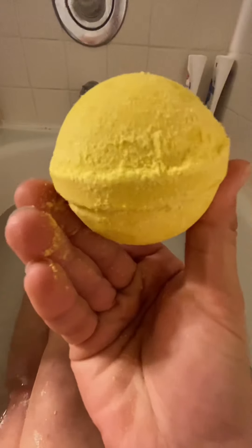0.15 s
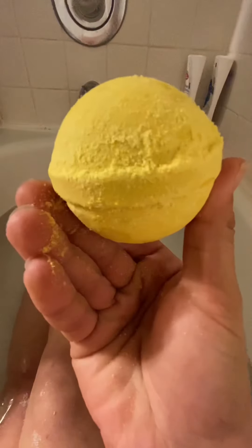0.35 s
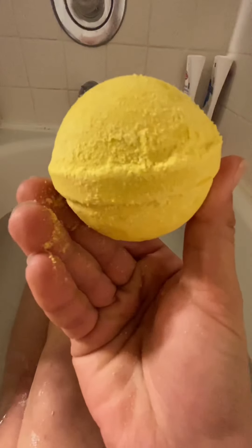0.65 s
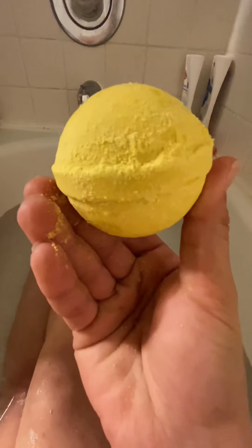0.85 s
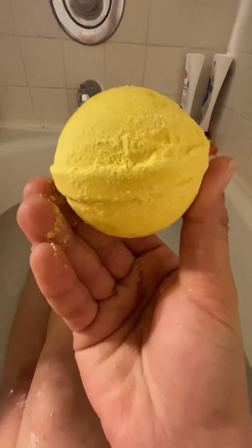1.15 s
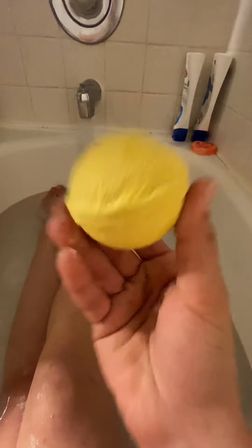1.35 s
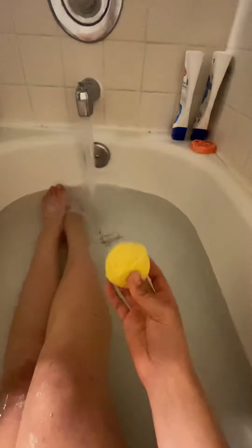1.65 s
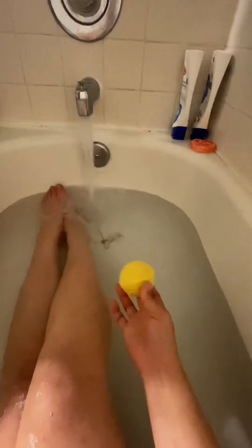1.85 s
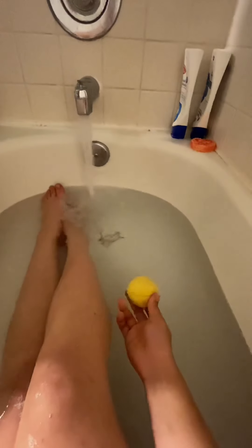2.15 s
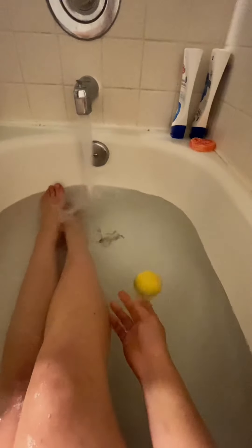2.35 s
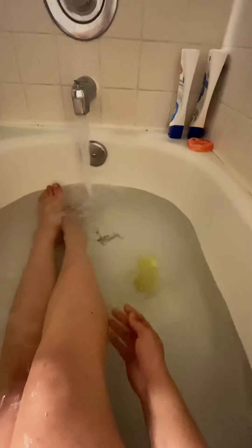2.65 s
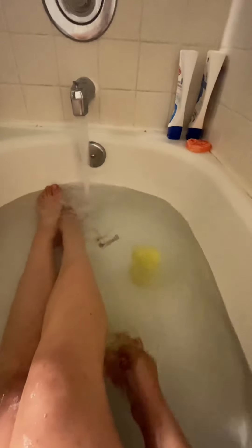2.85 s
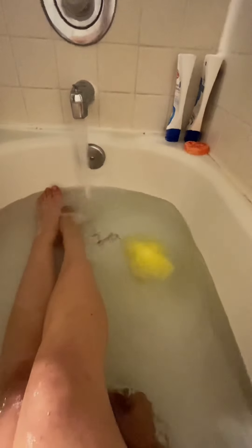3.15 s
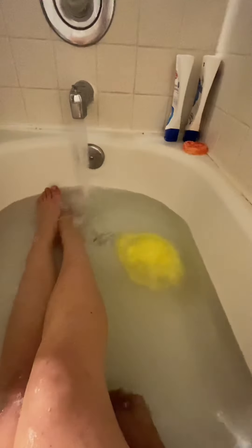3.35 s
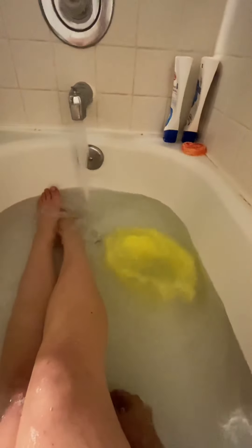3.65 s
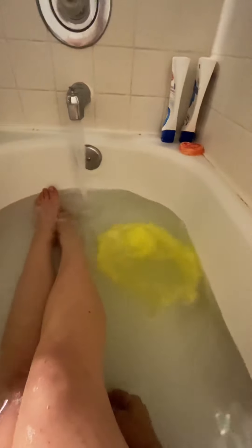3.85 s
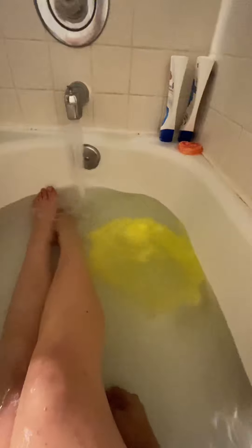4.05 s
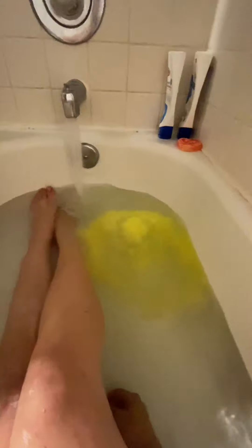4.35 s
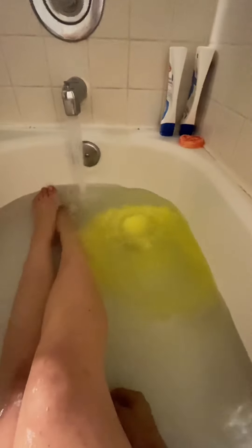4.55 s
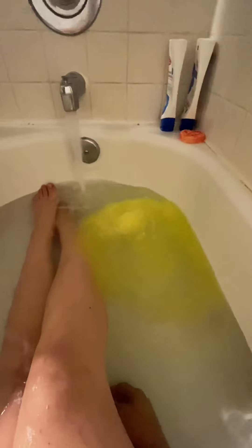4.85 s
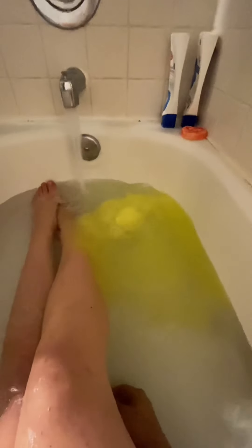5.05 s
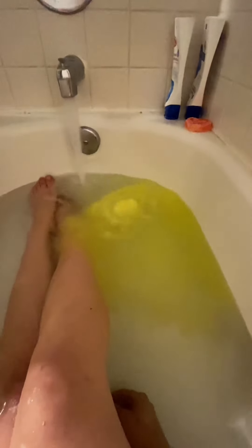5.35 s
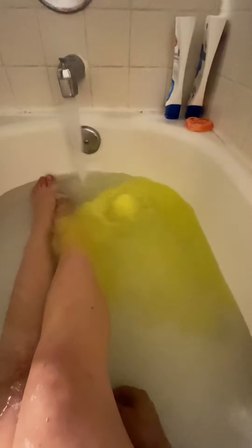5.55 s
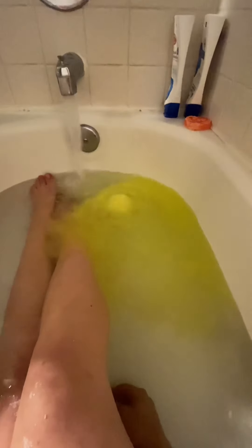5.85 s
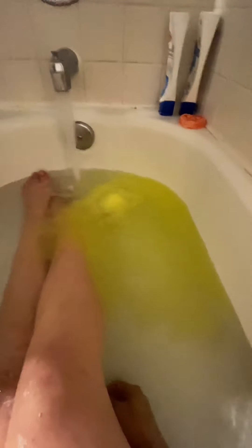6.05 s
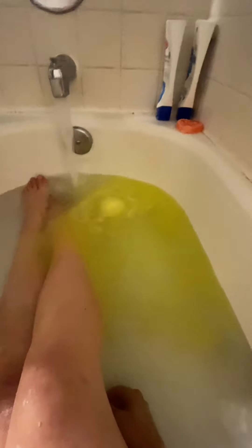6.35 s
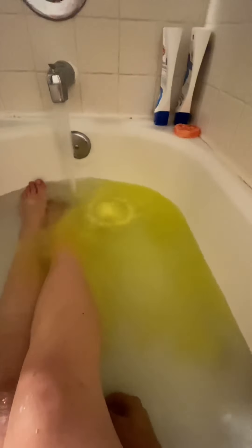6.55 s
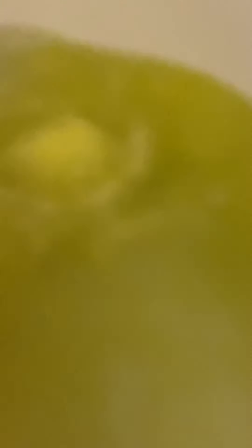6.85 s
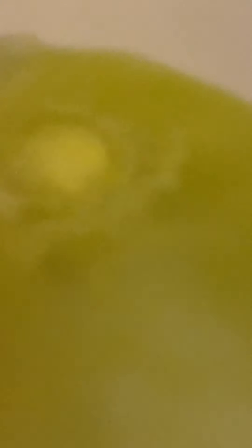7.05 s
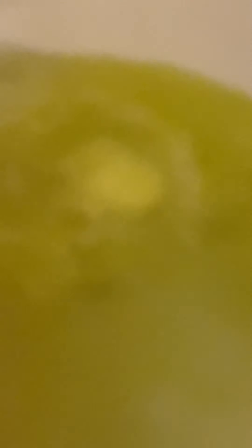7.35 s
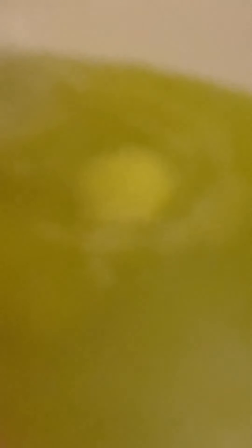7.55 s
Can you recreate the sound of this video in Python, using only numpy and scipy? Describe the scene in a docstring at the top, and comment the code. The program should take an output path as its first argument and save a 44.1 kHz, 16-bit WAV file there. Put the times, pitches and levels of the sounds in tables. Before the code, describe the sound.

A steady tap stream plunges into a half-full bathtub in a small tiled bathroom, with low tub rumble, dense bubbly splash and fine spray. Drops tick and small splats crackle throughout. A soft slop and boom come early on, gurgles later, and after six seconds the water churns harder as the microphone dips closer. A low motor hum continues underneath.

```python
"""A tap pours into a half-full bathtub in a small tiled bathroom, over the steady hum of a motor.
From the start, filtered noise rings the tub and damped sines give bubbles and spray, which slowly grows;
noise bursts tick as drops and clumps of damped sines splat. The first slop and soft modal boom come at 2.6 s,
and from 3.3 s gliding sines gurgle as bigger bubbles, thickest after 6 s. Around 6.4 s the water churns harder
and the microphone dips toward it; the splash moves to the centre, and slops and booms return to the end."""
import sys
import numpy as np
from scipy import signal
from scipy.fft import rfft, irfft, next_fast_len
from scipy.io import wavfile
from scipy.ndimage import uniform_filter1d, map_coordinates

SR = 44100
rng = np.random.default_rng(int(sys.argv[2]) if len(sys.argv) > 2 else 0)


def pcm_store(signal):
    """Save signal as 16-bit PCM."""
    levels = np.round(np.clip(np.atleast_2d(signal), -1, 1) * 32767)
    wavfile.write(sys.argv[1], SR, levels.astype(np.int16).T)


N = 340452

# Resonances of tub and room: f/Hz, width/Hz, relative level/dB
TUB_MODES = [(69.8, 12, -7), (85, 8, 1.5), (109, 8.5, 0), (117.7, 8.1, 5), (135, 10, -3), (169.4, 8.3, -3),
             (198.6, 8.1, -5.5), (233.3, 8.4, -0.5), (257.1, 7.5, 0.5), (295.4, 11.4, -6), (312.2, 12, -10),
             (369.8, 7.7, -9.5), (392.4, 7.6, -12), (423.2, 4.5, -17), (446.4, 17, -12), (478, 8.7, -7.5),
             (515.4, 9.3, -2.5), (678.4, 26, -17), (890, 81, -12.5), (1070, 41, -20.5), (1433, 50, -19.5)]
# Filter gain for the churning noise: f/Hz, relative level/dB
CHURN_COLOUR = [(20, -45), (35, -20.5), (58, -15), (110, -2.5), (200, -6.5), (280, -8), (340, -12),
                (450, -4.5), (700, -14), (1500, -18), (4000, -78)]
# Left-right correlation of the rumble: f/Hz, correlation (-1 to 1)
RUMBLE_CORRELATION = [(150, 1), (300, 0.95), (480, 0.82), (620, -0.9), (1000, -0.7), (1500, -0.65)]
# Water slopping in the tub: t/s, lift of the churn/dB
SLOPS_OF_WATER = [(2.64, 6), (6.31, 9), (6.585, 7.5), (6.66, 1.5), (7.05, 8.5), (7.62, 10)]
# Filter gain for large bubbles, small bubbles and spray: f/Hz, relative level/dB
LARGE_BUBBLE_COLOUR = [(250, -44), (550, 0), (675, -2), (750, -6.5), (880, 0), (960, -3), (1065, 2.5),
                       (1160, -6), (1250, 0.5), (1340, -5), (1435, 3.5), (1550, -4), (1900, -10),
                       (3000, -15)]
SMALL_BUBBLE_COLOUR = [(700, -19), (1400, -8.5), (1900, -9.5), (2350, -2.5), (2650, -1), (2850, 0),
                       (3100, 2), (3500, -0.5), (3950, -10), (4500, 0), (6000, -3.5), (12000, -40)]
SPRAY_COLOUR = [(2000, 3.5), (4000, 5), (4700, 5), (6200, 6.5), (8000, 11.5), (10000, -15.5), (12300, 4),
                (14300, 8.5), (16000, 0)]
# Drops that smack the surface: t/s, relative level/dB, f/Hz of the trapped bubble
SMACKING_DROPS = [(0.1292, -18, 2700), (0.799, -21.5, 2830), (0.945, -19, 4750), (1.0182, -22.5, 3440),
                  (1.582, -20.5, 6500), (1.625, -22.5, 5700), (1.7968, -18.5, 6000), (1.965, -21, 4270),
                  (2.133, -22.5, 4370), (2.193, -16, 3050), (2.801, -17.5, 2780), (3.739, -23, 6000),
                  (4.272, -18, 3400), (4.677, -20, 2160), (4.949, -19, 4400), (5.0889, -17, 5980),
                  (5.3844, -16.5, 5620), (5.568, -21.5, 7070), (5.651, -21, 5640), (6.156, -20, 6300),
                  (6.284, -16, 3020), (6.404, -15.5, 2910), (6.741, -16, 4730), (6.9152, -17.5, 2810),
                  (7.041, -18, 4320)]
# Fat lumps of the stream that splat: t/s, relative level/dB, f/Hz at the centre of the clump
FAT_LUMPS = [(.199, -26, 3100), (0.3945, -27, 3980), (0.52, -31.5, 3040), (.687, -34, 3000),
             (1.073, -32.5, 2940), (1.122, -28, 3580), (1.307, -26.5, 2660), (1.32, -33, 3140),
             (2.903, -27.5, 3020), (3.643, -27.5, 3150), (3.987, -28, 3450), (4.009, -30, 3270),
             (4.21, -31, 3150), (4.38, -31, 3180), (5.912, -27, 3400), (6.219, -30, 3160),
             (6.472, -30, 3900), (6.915, -35, 2860), (7.107, -29, 2930), (7.21, -26, 3150),
             (7.329, -29.5, 2900), (7.679, -29, 3230)]
# Big bubbles: t/s, relative level/dB, starting f/Hz, rise/octaves per ring time
BIG_BUBBLES = [(3.33, -27, 905, 0.33), (4.172, -27, 834, 1), (4.187, -15.5, 1230, 1),
               (4.949, -24.5, 525, 0.27), (5.644, -18.5, 1410, .2), (6.129, -20, 976, 0.49),
               (6.272, -31, 860, .3), (6.285, -21, 385, 0.34), (6.36, -18, 1284, 0.37),
               (6.404, -15.5, 1043, 0.34), (6.45, -25, 1440, .3), (6.492, -23, 995, .2),
               (6.545, -23, 673, 0.25), (6.555, -16, 376, 0.27), (6.577, -21.5, 476, .3),
               (6.781, -24, 1300, .3), (6.783, -18, 1630, 0.41), (7.03, -22, 387, .3),
               (7.04, -26, 1340, .3), (7.567, -30, 1360, 0.31), (7.65, -23.5, 1420, 0.25)]
# Soft booms of the tub: t/s, relative level/dB
BOOM_TIMES = [(2.632, 8.5), (6.691, 4), (7.421, -0.5)]
# Modes of one boom: f/Hz, relative level/dB, t60/s
BOOM_RESONANCES = [(70, -30.5, 0.45), (88.5, -26, 0.45), (133.5, -27.5, 0.27), (188, -25, 0.17),
                   (236, -18.5, 0.082)]
# Motor lines: f/Hz, rms level/dB about which each line wavers
MOTOR_LINES = [(43, -46.5), (119.3, -32)]
# Power that arrives straight from the jet: f/Hz, share (clipped to 0-1)
DIRECT_SHARE = [(500, 0.28), (2000, 0.1), (4000, 0.13), (6000, 0.42), (10000, 0), (16000, 0)]
# Reverberation of the tiles: f/Hz, t60/s
TILE_DECAY = [(100, .45), (500, 1), (3000, 0.63), (8000, 0.15), (16000, 0.07)]
# Side-to-mid ratio of the scrambled echoes: f/Hz, level/dB
WASH_WIDTH = [(800, 4.5), (1800, -0.5), (3000, 11.5), (4100, 0), (5000, 11.5), (6000, -4), (8000, 6),
              (10000, 48), (12000, 20), (16000, -17)]
# Colour at the microphone once near the water: f/Hz, mid level/dB, side level/dB
NEAR_WATER_COLOUR = [(80, 0, 0), (550, -1, -4), (1300, 2, -4), (2300, 2, -7), (3300, 5, -6), (5000, -1, -4),
                     (8000, -5.5, .5), (13000, 0, 0)]

RUMBLE_DB, BUBBLING_DB, SPLASH_DB, SPRAY_DB = -29, -40, -36.5, -39  # steady pour, before the room
SPRAY_DB_PER_S = 0.4537  # the spray grows a little as the tub fills
SWELL_S, SWELL_WIDTH_S = 6.43, 0.86  # for a moment the water churns harder
SWELL_RUMBLE_DB, SWELL_BUBBLING_DB = 0.5, 3.5
SLOP_S = 0.088  # half-width at 1/e
BURSTS_PER_S, BURST_S = 70, 0.0044  # how often lumps land, how fast they die
BURST_DB = 3.5  # mean lift of one lump, before each layer takes its share
SMACK_S, SMACK_ATTACK_S = 0.0043, 0.0004
SCATTER_S, SCATTER_DB = 0.02, -13.5  # the droplets that fall back
RING_S, RING_DB, RING_RISE_PER_S = 0.0036, -6.5, 5.5  # the tiny trapped bubble; fractional rise in pitch
SPLAT_S, SPLAT_OCTAVES, SPLAT_CYCLES = 0.0055, 0.294, 3.2  # length; bubble pitch spread and decay
GULP_T60_S, GULP_SIZE_LAW = 0.043, 0.75  # ring time at 1 kHz; lower bubbles ring longer by this power
GULP_FROTH_DB, GULP_FROTH_OCTAVES = -10.52, 0.35  # small bubbles shed by a big one: level, pitch spread
LEAN_START_S, LEAN_END_S = 6.45, 6.9  # the microphone dips toward the water
FIXED_ECHO_DB, WASH_DB = -1, -1  # echoes off still walls; echoes scrambled by the water
STILL_BELOW_HZ = 3470  # fixed echoes roll off above this
LOW_CUT_HZ, TOP_HZ = 38, 15850


def pour():
    """Superposition: a steady jet's rumble and splash add, both modulated by one swell."""
    churning = swell(SWELL_S, SWELL_WIDTH_S)
    rumble_db = RUMBLE_DB + SWELL_RUMBLE_DB * churning
    bubbling_db = BUBBLING_DB + SWELL_BUBBLING_DB * churning
    spray_db = SPRAY_DB + SPRAY_DB_PER_S * np.arange(N) / SR
    return rumble(rumble_db) + splashing(bubbling_db, SPLASH_DB, spray_db)


def tub_response(f):
    """Modal superposition: resonances of alternating sign, each confined to its neighbourhood."""
    total = 0
    for k, (centre, width, db) in enumerate(TUB_MODES):
        resonance = 1j * f * width / (centre ** 2 - f ** 2 + 1j * f * width)
        nearby = 1 / (1 + ((f - centre) / (3 * width)) ** 2)
        total = total + (-1) ** k * amp(db) * resonance * nearby
    return total


def rumble(level_db):
    """Forced resonance: the plunging jet churns the water and keeps the tub's modes ringing."""
    ringing = unit(filtered(rng.standard_normal((2, N)), tub_response))
    uneven_noise = rng.standard_normal((2, N)) * amp(2.8 * wobble(32))
    churn = coloured(uneven_noise, CHURN_COLOUR) * amp(surges(SLOPS_OF_WATER, SLOP_S))

    def mid_side_gains(hz):
        """Correlation of two channels follows from the ratio of mid to side."""
        turn = np.arccos(np.clip(along(RUMBLE_CORRELATION, hz), -1, 1)) / 2
        return np.array([np.cos(turn), np.sin(turn)])

    mid, side = filtered(amp(-0.46) * ringing + amp(-8.5) * churn, mid_side_gains)
    return amp(level_db) * np.array([mid + side, mid - side])


def splashing(bubbling_db, splash_db, spray_db):
    """Jet break-up: each lump of the stream frees bubbles of all sizes and a puff of spray."""
    lumps = 0.09 * wobble(11) + bursts()
    large = bubbles(449, 2186, cycles=6, spread_db=3.5, count=3600, size=800)
    small = bubbles(1373, 6070, cycles=4.6, spread_db=3.5, count=13000, size=200)
    mist = bubbles(3700, 14000, cycles=1, spread_db=3.5, count=50000, size=32)
    large = unit(coloured(large, LARGE_BUBBLE_COLOUR) * amp(0.62 * lumps))
    small = unit(coloured(small, SMALL_BUBBLE_COLOUR) * amp(0.37 * lumps))
    mist = unit(coloured(mist, SPRAY_COLOUR) * amp(lumps + 2.7 * wobble(90)))
    water = amp(bubbling_db) * large + amp(splash_db) * small + amp(spray_db) * mist
    return bathroom(water) * amp([[-0.3], [0.3]])


def bursts():
    """Shot noise: lumps land at random, lift the splash at once and decay (dB about the mean)."""
    luck = rng.random(N)
    size = np.minimum(rng.exponential(size=N), 3)
    landings = size * (luck < BURSTS_PER_S / SR)
    lift = signal.lfilter([1], [1, -np.exp(-1 / (BURST_S * SR))], landings)
    return BURST_DB * np.minimum(lift - lift.mean(), 2.3)


def bubbles(low_hz, high_hz, cycles, spread_db, count, size):
    """Bubble resonance: damped sines, many faint and few strong, rise in pitch near the surface."""
    when, pitch, luck = rng.random((count, 3)).T[:, :, None]
    hz = low_hz * (high_hz / low_hz) ** pitch
    turns = hz * np.arange(size) / SR
    age = turns / cycles
    strength = amp(-spread_db * np.log(luck + 0.0085)) * np.sqrt(hz)
    phase = 2 * np.pi * turns * (1 + 0.028 * np.minimum(age, 5))
    waves = strength * np.exp(-age) * np.sin(phase)
    places = (when * N).astype(int) + np.arange(size)
    return np.bincount(places.ravel(), waves.ravel())[:N]


def drops():
    """Impact and entrainment: a drop smacks, scatters droplets and traps a bubble rising in pitch."""
    track, t = np.zeros(N), np.arange(SR // 20) / SR
    for s, db, hz in SMACKING_DROPS:
        smack = rng.standard_normal(len(t)) * np.exp(-(t / SMACK_S) ** 2) * (1 - np.exp(-t / SMACK_ATTACK_S))
        # the eighth power leaves a few strong peaks, hence separate droplets
        ragged = unit(uniform_filter1d(rng.standard_normal(len(t)) ** 8, size=24))
        scatter = rng.standard_normal(len(t)) * np.sqrt(np.abs(ragged)) * np.exp(-t / SCATTER_S)
        ring = np.sin(2 * np.pi * hz * t * (1 + RING_RISE_PER_S * t / 2))
        ring *= np.exp(-t / RING_S) * (1 - np.exp(-t / 0.00033))
        add(track, s, amp(db) * (0.82 * smack + amp(SCATTER_DB) * scatter + amp(RING_DB) * ring))
    colour = [(100, -25), (600, -9), (2500, 0.5), (6500, 4.0), (15000, -4)]  # f/Hz, level/dB
    track = filtered(track, lambda hz: amp(along(colour, hz)))
    return amp(-2.5) * straight(track) + amp(-7.5) * wash(track)


def splats():
    """Fragmentation: each fat lump of the stream bursts into a clump of tiny bubbles."""
    track = np.zeros(N)
    for s, db, hz in FAT_LUMPS:
        add(track, s, amp(db) * clump(hz, count=16))
    return amp(-1.0) * straight(track) + amp(-1.5) * wash(track)


def clump(hz, count):
    """Exponential birth law: bubbles around one pitch start in a rush; rms 1 if packed into SPLAT_S."""
    t = np.arange(SR // 12) / SR
    born = -SPLAT_S * np.log(1 - (np.arange(count) + rng.random(count)) / count)
    pitch = hz * 2 ** (SPLAT_OCTAVES * rng.standard_normal((count, 1)))
    turns = pitch * np.maximum(t - born[:, None], 0)
    cloud = (pitch * np.sin(2 * np.pi * turns) * np.exp(-turns / SPLAT_CYCLES)).sum(0)
    return unit(cloud) * np.sqrt(SPLAT_S / t[-1])


def gulps():
    """Bubble resonance: big bubbles swell, ring and glide upward in froth; the larger, the longer."""
    track, t = np.zeros(N), np.arange(SR // 6) / SR
    grid = np.fft.rfftfreq(len(t), 1 / SR) + 1
    for s, db, hz, rise in BIG_BUBBLES:
        t60 = GULP_T60_S / (hz / 1000) ** GULP_SIZE_LAW
        phase = 2 * np.pi * np.cumsum(hz * 2 ** (rise * np.minimum(t / t60, 1))) / SR
        froth_band = np.exp(-(np.log2(grid / hz) / GULP_FROTH_OCTAVES) ** 2 / 2)
        froth = unit(irfft(rfft(rng.standard_normal(len(t))) * froth_band, len(t)))
        fade = amp(-60 * t / t60)
        sound = fade * np.sin(phase) + amp(GULP_FROTH_DB) * np.sqrt(fade) * froth
        add(track, s, amp(db) * (1 - np.exp(-t / 0.0055)) * sound)
    return straight(track) + amp(-4) * wash(track)


def booms():
    """Free vibration: soft thuds excite low modes of the tub, which decay exponentially."""
    track, t = np.zeros(N), np.arange(SR // 2) / SR
    boom = sum(amp(db - 60 * t / t60) * np.sin(2 * np.pi * hz * t) for hz, db, t60 in BOOM_RESONANCES)
    for s, db in BOOM_TIMES:
        add(track, s, amp(db) * boom * (1 - np.exp(-t / 0.0099)))
    return track


def hum():
    """Line spectrum: a motor's shaft and mains tones, slightly unsteady in level and phase."""
    t, track = np.arange(N) / SR, np.zeros(N)
    for hz, db in MOTOR_LINES:
        level = np.sqrt(2) * amp(db + 1.4 * wobble(3.89))
        track += level * np.sin(2 * np.pi * hz * t + 0.16 * wobble(2.09))
    return track


def bathroom(x):
    """Direct and reverberant fields: power is shared by frequency; fixed echoes lose their treble."""
    share = lambda hz: np.clip(along(DIRECT_SHARE, hz), 0, 1)
    direct = filtered(x, lambda hz: np.sqrt(share(hz)))
    wet = filtered(x, lambda hz: np.sqrt(1 - share(hz)))
    still = filtered(wet, lambda hz: 1 / (1 + (hz / STILL_BELOW_HZ) ** 4))
    return straight(direct) + amp(FIXED_ECHO_DB) * echoes(still) + amp(WASH_DB) * wash(wet)


def straight(x):
    """Interchannel delay: the direct path reaches the right port a little earlier."""
    lag = 4.9e-5  # s, right ahead of left
    return filtered(x, lambda hz: np.exp(1j * np.pi * hz * lag * np.array([[-1], [1]])))


def echoes(x):
    """Reverberation: convolution with decaying noise at two ports; each frequency has its own t60."""
    hz, t, z = signal.stft(rng.standard_normal((2, SR // 2)), SR, nperseg=256)
    near_walls = 1 + 2.0 * np.exp(-t / 0.012)  # the near walls of the tub answer first
    fade = amp(-60 * t / along(TILE_DECAY, hz)[:, None]) * near_walls
    tail = signal.istft(z * fade / np.linalg.norm(fade, axis=1, keepdims=True), SR, nperseg=256)[1]
    tail = tail / np.linalg.norm(tail, axis=1, keepdims=True)
    return signal.fftconvolve(x[None], tail, axes=1)[:, :N]


def wash(x):
    """Diffuse scattering: echoes off rocking water keep energy and colour but lose fine pattern."""
    hz, t, z = signal.stft(x, SR, nperseg=256)
    t = t[:128]  # the first 0.37 s of decay
    fade = (amp(-60 * t / along(TILE_DECAY, hz)[:, None]) * (1 + 3.5 * np.exp(-t / 0.023))) ** 2
    fade = fade / fade.sum(1, keepdims=True)
    power = np.abs(signal.fftconvolve(np.abs(z) ** 2, fade, axes=1))[:, :z.shape[1]]
    noise = signal.stft(rng.standard_normal((2, N)), nperseg=256)[2]
    turn = np.arctan(amp(along(WASH_WIDTH, hz)))[:, None]
    scrambled = np.sqrt(power) * noise / np.std(noise) * [np.cos(turn), np.sin(turn)]
    mid, side = signal.istft(scrambled, nperseg=256)[1][:, :N]
    return np.array([mid + side, mid - side])


def leaning(x):
    """Mid-side filtering: as the microphone dips, splash moves to the centre and hiss to the sides."""
    lean = np.interp(np.arange(N) / SR, [LEAN_START_S, LEAN_END_S], [0, 1])
    f, *columns = np.transpose(NEAR_WATER_COLOUR)
    mid_side = np.array([x[0] + x[1], x[0] - x[1]]) / 2
    mid, side = filtered(mid_side, lambda hz: amp([along(np.c_[f, db], hz) for db in columns]))
    return (1 - lean) * x + lean * np.array([mid + side, mid - side])


def swell(s, width):
    """Gaussian envelope of height 1 around time s."""
    return np.exp(-((np.arange(N) / SR - s) / width) ** 2)


def surges(rows, width):
    """Sum of Gaussian lifts in dB, one for each (t/s, level/dB) row."""
    return sum(db * swell(s, width) for s, db in rows)


def wobble(rate):
    """Band-limited fluctuation: a smooth curve through random knots, rate a second."""
    return map_coordinates(rng.standard_normal(4096), [np.arange(N) * rate / SR], mode="wrap")


def filtered(x, response):
    """Linear filtering: the spectrum of x times a complex response of frequency."""
    m = next_fast_len(N + SR // 2)
    return irfft(rfft(x, m) * response(np.fft.rfftfreq(m, 1 / SR)), m)[..., :N]


def coloured(x, spectrum):
    """Spectral shaping: x filtered by (f/Hz, level/dB) points, at rms 1."""
    return unit(filtered(x, lambda hz: amp(along(spectrum, hz))))


def along(points, hz):
    """Linear interpolation of (f/Hz, value) points on a logarithmic frequency axis."""
    f, v = np.transpose(points)
    return np.interp(np.log(hz + 1), np.log(f + 1), v)


def amp(db):
    """Amplitude ratio of a level in decibels."""
    return 10 ** (np.asarray(db) / 20)


def unit(x):
    """Normalisation of x to rms 1."""
    return x / np.sqrt(np.mean(x ** 2) + 1e-20)


def add(track, s, sound):
    """Superposition of a sound on a track from time s."""
    part = track[max(round(s * SR), 0):][:len(sound)]
    part += sound[:len(part)]


def scene():
    """Superposition of all sources at the far end of the tub, a little stronger on the right."""
    water = leaning(pour() + drops() + splats())
    return (water + gulps() + booms() + hum()) * amp([[-0.25], [0.25]])


def record(dry):
    """Band limiting: the recorder drops the deepest bass and keeps nothing from TOP_HZ up."""
    return filtered(dry, lambda hz: (hz < TOP_HZ) * (1 - 1 / (1 + (hz / LOW_CUT_HZ) ** 8)))


dry = scene()
out = record(dry)
pcm_store(out)
```